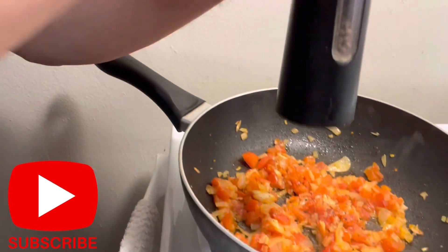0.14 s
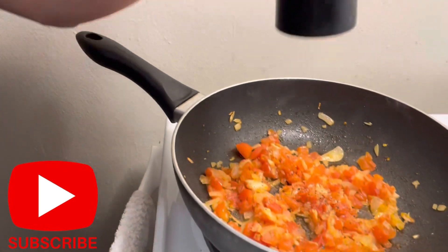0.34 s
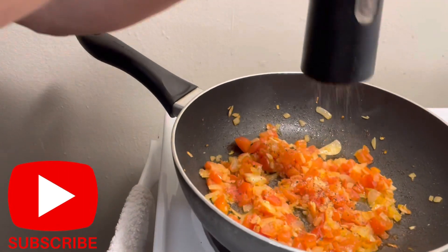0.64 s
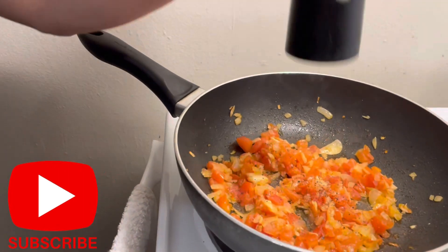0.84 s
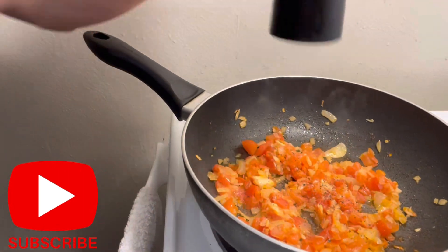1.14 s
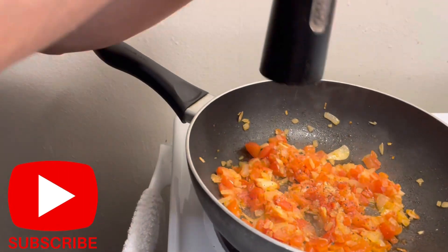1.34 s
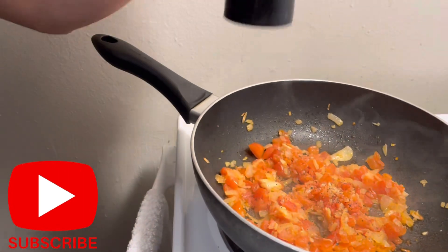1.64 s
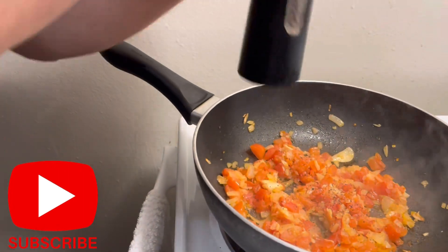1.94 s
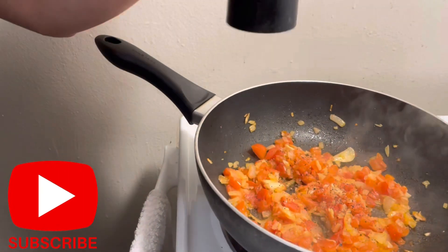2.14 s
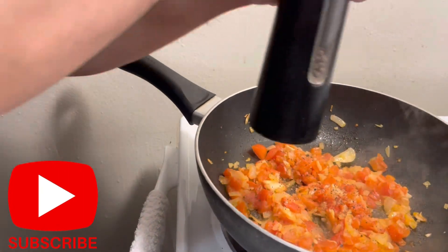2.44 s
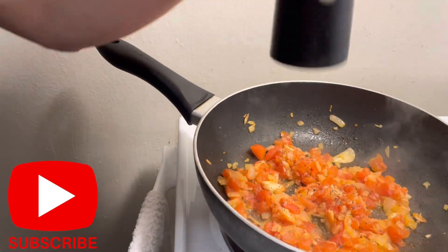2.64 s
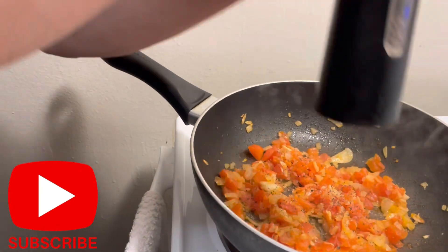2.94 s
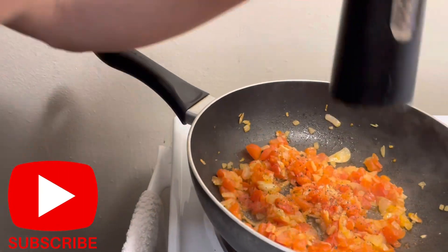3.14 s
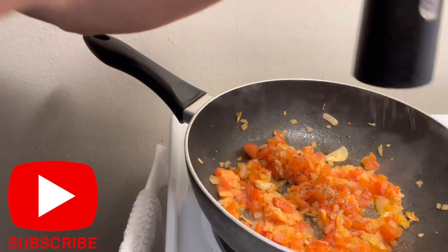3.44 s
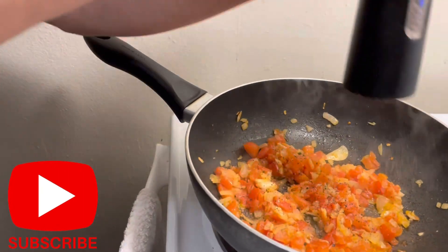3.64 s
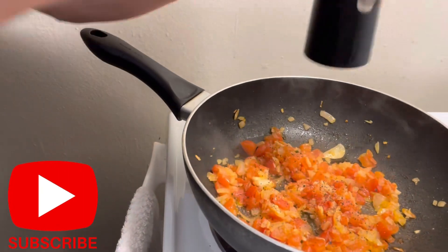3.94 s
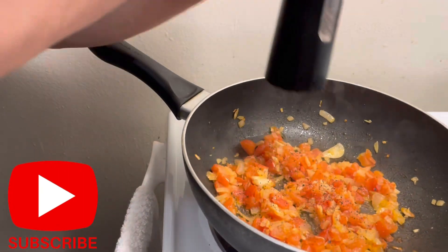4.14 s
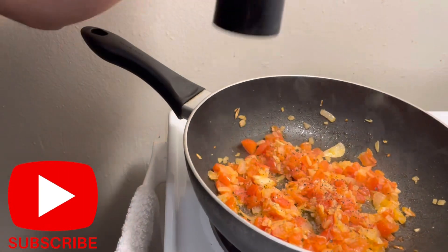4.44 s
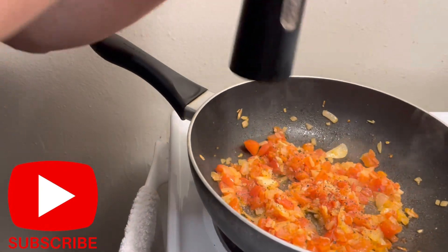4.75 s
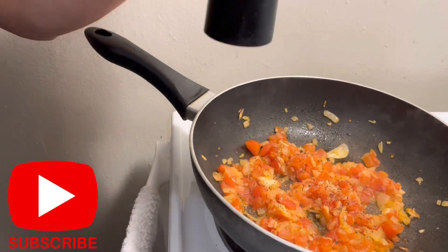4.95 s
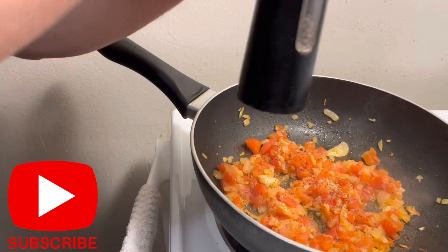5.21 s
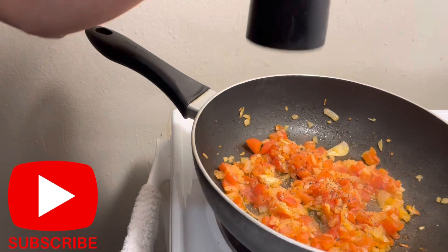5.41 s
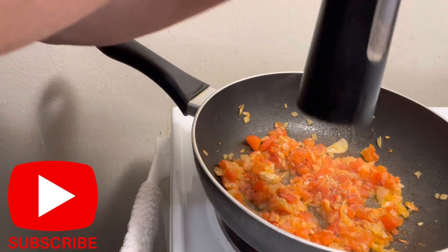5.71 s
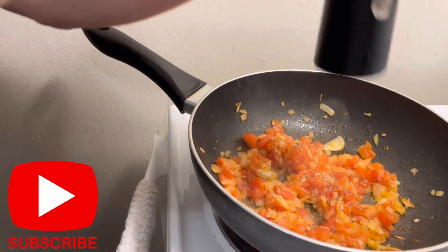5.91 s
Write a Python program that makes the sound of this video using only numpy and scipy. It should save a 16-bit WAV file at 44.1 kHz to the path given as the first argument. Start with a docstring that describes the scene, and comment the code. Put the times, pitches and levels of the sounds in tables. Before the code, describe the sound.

A pepper mill grinds in short crunching twists about twice a second over a sizzling pan and a low kitchen hum.

```python
"""A hand mill bites into peppercorns at once, over sizzling vegetables and motors humming against the
mains in a small kitchen. It is twisted about twice a second: corns crack and grind between the burrs
and ring the mill's body. From just after the first twist, fat spits in the pan. The last twist comes
at 5.6 s and leaves the pan frying. Throughout, two close microphone ports differ in treble phase."""
import sys
import numpy as np
from scipy import signal
from scipy.fft import rfft, irfft, next_fast_len
from scipy.io import wavfile

SR = 44100
rng = np.random.default_rng(int(sys.argv[2]) if len(sys.argv) > 2 else 0)


def persist_wave(psi):
    """Save psi, clipped to +-1, as 16-bit WAV."""
    counts = np.round(np.clip(psi, -1, 1) * 32767).astype(np.int16)
    wavfile.write(sys.argv[1], SR, np.atleast_2d(counts).T)


N = 267907
SIZE = next_fast_len(N + SR)
HZ = np.arange(SIZE // 2 + 1) * SR / SIZE

# peppercorns cracking: start_s, peak_db, bright_hz, knock_db, body_db, bright_db, crumble_ms
CORN_CRACKS = [(0.0189, -9.5, 3600, -12, 21, 16, 2), (0.0333, -12.5, 3800, -5, -9, 14, 1.9),
               (0.0378, -27, 4100, -12, 10, 20, 3.8), (0.142, -25.5, 2570, -13, 13, 7, 3.3),
               (0.524, -18.5, 3040, -11, -17, -4, 7.3), (0.544, -19.5, 2390, -17, -15, 0, 3.4),
               (0.575, -14, 4360, -3, -25, 15, 2.5), (0.6086, -9, 2260, -2, -28, -2, 3.3),
               (0.6152, -11, 2200, -11, -18, 0, 2.1), (0.6525, -5, 4170, -24, -24, 10, 3.5),
               (0.6605, -16, 3000, -24, 14, 15, 4.5), (1.103, -19, 4330, -9, -19, 20, 3.5),
               (1.1225, -15, 4330, -1, -17, 3, 3), (1.1283, -19, 4400, -9, -17, 10, 1.8),
               (1.1637, -7.5, 2500, 4, 17.5, -0.5, 3.1), (1.1748, -19, 2700, -5, 0, 12, 4.4),
               (1.1996, -18, 4100, -6, -19, 8, 2), (1.697, -18, 4300, -3, 3, 5, 3.8),
               (1.7134, -18.5, 4350, -14, 12, 6, 5.8), (1.734, -28, 2300, -9, -9, 2, 2.5),
               (1.7485, -15.5, 3180, -2, -3, 12, 1.7), (1.755, -15, 3000, 14, 11, 10, 3),
               (1.7645, -26, 3000, -4, -3, 6, 3), (1.824, -28, 4100, -8, -8, 7, 4),
               (2.27, -20, 3240, 6, -3, 10, 4.8), (2.3202, -16, 2220, -3, -21, 11, 6.9),
               (2.3511, -17.5, 3730, -7, -16, 19, 2.5), (2.416, -11, 3000, -15, 21, 10.5, 3.4),
               (2.8339, -21.5, 4200, -11, -17, 18, 2.5), (2.8443, -20, 4140, -9, 5, 5, 1.5),
               (2.849, -16, 4140, -5, -15, 0, 4.5), (2.8778, -18.5, 3160, -9, -11, 13, 1.3),
               (2.9082, -16.5, 4100, -11, -17, 3, 3.6), (2.9194, -13.5, 3900, -17, -24, 4, 3.3),
               (2.976, -27.5, 4350, -4, -9, 13, 6), (3.378, -20.5, 3450, -2, -15, 4, 4),
               (3.4212, -17.5, 2400, -1, -9, 6, 2.9), (3.433, -3, 3200, 2, 5, 8, 1.85),
               (3.448, -22, 2300, -3, 7, 3, 2.5), (3.478, -14, 3460, -16, 8, 4.5, 4.9),
               (3.925, -30, 4140, -5, -6, 6, 4), (3.943, -24.5, 1990, 7.5, -1, 6, 6.9),
               (3.992, -23.5, 2260, -12, 26, 6, 2.9), (4.011, -22, 1910, 15, 18.5, 13, 4.2),
               (4.488, -22, 3600, -5, 25, 4, 5.7), (4.5146, -6, 3620, -11, 19, 6, 4.3),
               (4.54, -4, 3650, 2, 16, 10, 2.4), (4.5435, -8, 3500, -12, 8, 4, 3.3),
               (4.553, -12.5, 2380, -9, -3, 9, 2), (4.939, -29, 3350, 8, -7, 8, 3.5),
               (5.039, -26.5, 4380, -7, 22, 6, 5.6), (5.067, -22.5, 4000, -13, 24, 12, 3.5),
               (5.083, -25, 3100, -14, 6, 10, 4.2), (5.1046, -13, 4170, 4, 20.5, 8, 3.3),
               (5.5908, -13.5, 4460, -6, 15, 7, 4.9), (5.5973, -19, 4300, -9, 0, 13, 3.3),
               (5.629, -17, 4180, 10, -6, 12, 3.9), (5.637, -11, 4200, -9, 0, 10, 1.6),
               (5.64, -11, 3870, 0, 27, 6, 2.5), (5.6471, -20, 4200, -5, -3, 16, 4.7),
               (5.6869, -18.5, 2100, -18, 26, 11, 2)]
# twists of the hand at full pressure: start_s, held_s, level_db, rasp_hz, rasp_db
HAND_TWISTS = [(0.0, 0.0073, -36, 3700, 3), (.53, 0.19, -42, 3080, 7), (1.105, 0.047, -37, 4400, 7.5),
               (1.699, 0.065, -35, 3270, -7), (2.264, 0.094, -40.5, 2270, -9),
               (2.836, 0.075, -35, 4100, 12), (3.43, 0.033, -35.5, 3380, 2), (3.93, 0.039, -40, 2920, 1),
               (4.512, 0.046, -32.5, 4100, 3), (5.069, 0.048, -35.5, 3830, 9),
               (5.6, 0.051, -39.5, 4640, -6)]
# resonances of the mill's body: pitch_hz, level_db, t60_s
MILL_MODES = [(410, -18, 0.022), (470, -1, 0.028), (610, -15, 0.019), (840, -34, 0.022),
              (1036, -20.5, 0.033), (1130, -27, 0.027), (1440, -12, 0.0098), (1750, -10.5, 0.0064),
              (2020, -12, 0.03), (2180, 4, 0.018), (2490, 2.5, 0.022), (2740, 3, 0.019), (3132, 5, 0.021),
              (3370, -1.5, 0.019), (3526, 6, 0.0085), (3777, 5, 0.013), (4110, 2, 0.031),
              (4413, 4.5, 0.015), (4600, -18.5, 0.023), (5320, 2, 0.0095), (6000, 1.5, 0.0065),
              (6790, 2.5, 0.0079), (9010, 1.5, 0.0062), (10360, -3, 0.003), (13000, -39.5, .002)]


def from_db(db):
    """Gain of a level in dB."""
    return 10 ** (np.asarray(db) / 20)


def rms_one(x):
    """Scaled to unit rms."""
    return x / np.sqrt(np.mean(x ** 2) + 1e-20)


def at_hz(points, hz):
    """A curve over frequency, read on a log axis."""
    point_hz, values = np.transpose(points)
    return np.interp(np.log(hz + 1), np.log(point_hz + 1), values)


def bell(hz, centre_hz, octaves):
    """A bell curve round a pitch, 1 at its centre."""
    return np.exp(-(np.log2(hz / centre_hz) / octaves) ** 2)


def filtered(x, response):
    """x through a frequency response given on the HZ grid."""
    return irfft(rfft(x, SIZE) * response, SIZE)[..., :N]


def drift(rate_hz):
    """Slow random wander of unit rms."""
    return rms_one(filtered(rng.standard_normal(N), 1 / (1 + (HZ / rate_hz) ** 2)))


def grains(per_s, spread_db):
    """Random clicks of uneven size."""
    sizes = from_db(spread_db * np.minimum(rng.exponential(1, N), 5)) * rng.choice([-1, 1], N)
    return sizes * (rng.random(N) < per_s / SR)


def add(track, start_s, sound):
    """Mix a short sound into the track."""
    at = round(start_s * SR)
    track[..., at:at + sound.shape[-1]] += sound[..., :N - at]


def stereo_bed(pair, spectrum):
    """Two unrelated noises, coloured and mixed as mid and side; unit rms."""
    # how alike left and right are: pitch_hz, correlation
    likeness = [(60, .95), (140, .9), (250, .6), (1000, .5), (3000, .72), (6000, .65), (8000, .96),
                (17000, .97)]
    alike = at_hz(likeness, HZ)
    colour = from_db(at_hz(spectrum, HZ))
    mid = filtered(pair[0], colour * np.sqrt(1 + alike))
    side = filtered(pair[1], colour * np.sqrt(1 - alike))
    return rms_one(np.array([mid + side, mid - side]))


def kitchen(x, t60_s=0.27, wall_cut_hz=4200):
    """The walls: a dull, dying noise tail of its own for each side."""
    t = np.arange(SR // 2) / SR
    dull = signal.lfilter(*signal.butter(1, wall_cut_hz, fs=SR), rng.standard_normal((2, len(t))))
    tail = dull * from_db(-60 * t / t60_s) * np.minimum(t / 0.013, 1)
    return signal.fftconvolve(x, tail / np.sqrt(np.sum(tail ** 2) / 2), axes=1)[:, :N]


def scattered(sound, echo_db=-4.5, t60_s=0.06):
    """Direct sound plus reflections off pan, hob and hands, new each time as the mill keeps moving."""
    t = np.arange(2048) / SR
    path = rng.standard_normal((2, len(t))) * from_db(-60 * t / t60_s) * np.minimum(t / 0.00055, 1)
    path = from_db(echo_db) * path / np.sqrt(np.sum(path ** 2) / 2)
    path[:, 0] += 1
    return signal.fftconvolve(sound[None], path, axes=1)


def rumble():
    """Room air and motor rumble: a low, steady noise bed."""
    # colour of the bed: pitch_hz, gain_db
    colour = [(20, -28), (32, -29), (45, 1), (55, 0), (72, -0.5), (90, 0.5), (105, -5), (130, -9),
              (200, -6.5), (420, -10), (540, -10.5), (600, -2), (750, -5), (850, -10.5), (1300, -10),
              (3000, -12.5), (8000, -32)]
    return from_db(-50) * stereo_bed(rng.standard_normal((2, N)), colour)


def hum():
    """Steady motor and mains tones, each wavering a little in level."""
    # two of these tones beat near 118 Hz: pitch_hz, level_db, left_over_right_db
    tones = [(53.2, -66, 0), (58.54, -59, 0), (80.1, -69, 0), (84.8, -65, 0), (117.08, -58, -4),
             (119.9, -63, -5), (157.5, -70, -5), (175.62, -65, -2), (196.5, -78, 8), (275.2, -71, 0),
             (314.9, -76, 6), (351.25, -70, -4)]
    t, out = np.arange(N) / SR, np.zeros((2, N))
    for hz, level_db, balance_db in tones:
        tone = np.sqrt(2) * np.sin(2 * np.pi * (hz * t + rng.random()))
        tone *= from_db(level_db + 0.49 * drift(7.2))
        out += tone * from_db([[balance_db / 2], [-balance_db / 2]])
    return out


def sizzle():
    """Tiny steam bursts merge into a fluttering hiss, with sparser sharp ticks on top."""
    # the pan's loudness: time_s, level_db
    frying = [(0.0, -40), (0.57, -39.5), (2.15, -39.5), (2.97, -39.5), (3.5, -38.5), (4.56, -39),
              (6.07, -40.5)]
    # colour of the sizzle: pitch_hz, gain_db
    colour = [(500, -20), (1000, -6), (2000, -3), (2800, -4), (4000, -2), (5000, -1), (6500, 0), (9000, 0),
              (11000, -2.5), (13000, -5), (15000, -1.5), (17000, -1.5)]
    fizz = rng.standard_normal((2, N)) * from_db(drift(16))
    for tick_hz in np.geomspace(5500, 15000, num=4):
        ticks = grains(70, spread_db=1.3) * from_db(2.5 * drift(8))
        fizz[0] += from_db(-15.5) * rms_one(filtered(ticks, bell(HZ + 1, tick_hz, octaves=0.85)))
    level_db = np.interp(np.arange(N) / SR, *np.transpose(frying))
    return from_db(level_db) * stereo_bed(fizz, colour)


def spits(decay_s=0.00087):
    """Drops of fat burst, each a snap of noise in a wide band."""
    # bursting drops: start_s, peak_db, centre_hz
    drops = [(0.436, -23, 7000), (0.851, -14, 13000), (0.8577, -34, 6500), (0.999, -30, 11000),
             (1.4486, -19.5, 6260), (1.593, -17, 12600), (1.5987, -15, 12000), (2.1377, -22, 12800),
             (2.3404, -23, 12100), (2.3428, -20, 9900), (2.523, -36, 6500), (2.535, -22.5, 5900),
             (2.863, -22, 6100), (3.009, -19, 5100), (3.056, -25, 13500), (3.206, -24, 7550),
             (3.346, -19, 13600), (3.705, -26, 4500), (3.758, -20, 10500), (4.011, -24, 12000),
             (4.0242, -18, 11400), (4.7731, -30, 14500), (4.96, -20, 11500), (5.244, -30, 5600),
             (5.404, -24, 12500), (5.7597, -26, 10700), (5.809, -28, 11800)]
    out, t = np.zeros((2, N)), np.arange(512) / SR
    for (start_s, peak_db, centre_hz), noise in zip(drops, rng.standard_normal((len(drops), len(t)))):
        band = signal.butter(1, [centre_hz / 1.37, min(centre_hz * 1.36, 19000)], "band", fs=SR)
        snap = signal.lfilter(*band, noise * np.exp(-t / decay_s))
        snap = from_db(peak_db) * snap / np.abs(snap).max()
        add(out, start_s, scattered(snap, echo_db=-7))   # drier than the mill, with a faint short tail
    return out


def body_modes(grip, detune_share=0.018):
    """One decaying sine for each mode of the mill, detuned by the grip, and their resting pitches."""
    hz, level_db, t60_s = np.transpose(MILL_MODES)[:, :, None]
    t = np.arange(round(.04 * SR)) / SR
    gripped_hz = hz * (1 + detune_share * grip[:, None])
    return from_db(level_db - 60 * t / t60_s) * np.sin(2 * np.pi * gripped_hz * t), hz[:, 0]


def grit_level(bite_db_per_s=1200, ease_db_per_s=237, shards_db=-29.5, shards_t60_s=0.15):
    """Grit swells as the hand bears down and fades as it lets go; shards rub on after each crack."""
    t = np.arange(N) / SR
    start_s, held_s, level_db = np.transpose(HAND_TWISTS)[:3, :, None]
    pressed_db = level_db - bite_db_per_s * np.maximum(start_s - t, 0)
    pressed_db -= ease_db_per_s * np.maximum(t - start_s - held_s, 0)
    crack_s, peak_db = np.transpose(CORN_CRACKS)[:2]
    breaks = np.zeros(N)
    breaks[(crack_s * SR).astype(int)] = from_db(peak_db + shards_db)
    shards = signal.lfilter([1], [1, -from_db(-60 / (shards_t60_s * SR))], breaks + 1e-18)
    return np.hypot(from_db(pressed_db.max(axis=0)), shards)


def grinding():
    """Dense grit clicks ring the mill's body, held a little differently on each twist."""
    out = np.zeros((2, N))
    grit = grit_level() * rms_one(grains(4000, spread_db=2.5) * from_db(2.5 * drift(60)))
    grips = rng.standard_normal((len(HAND_TWISTS), len(MILL_MODES)))
    for (start_s, _, _, rasp_hz, rasp_db), grip in zip(HAND_TWISTS, grips):
        begin_s = max(start_s - .1, 0)
        rubbing = grit[round(begin_s * SR):round((start_s + .35) * SR)]
        modes, hz = body_modes(grip)
        low_cut_db = 3.5 / (1 + (hz / 1500) ** 4)   # fine grit moves the low modes less
        body = from_db(rasp_db * bell(hz, rasp_hz, octaves=.12) - low_cut_db) @ modes
        rasp = signal.fftconvolve(rubbing, body / np.sqrt(np.sum(body ** 2)))
        add(out, begin_s, scattered(rasp))
    return out


def cracks(treble_db=-0.1):
    """A corn breaks in a quick run of fractures; each crack favours its own modes of the mill."""
    out, t = np.zeros((2, N)), np.arange(1024) / SR
    draws = rng.standard_normal((len(CORN_CRACKS), len(t) + 2 * len(MILL_MODES)))
    for crack, draw in zip(CORN_CRACKS, draws):
        start_s, peak_db, bright_hz, knock_db, body_db, bright_db, crumble_ms = crack
        noise, mode_jitter, grip = np.split(draw, [len(t), len(t) + len(MILL_MODES)])
        uneven = noise * np.abs(noise)   # a few fractures stand out
        fractures = uneven * np.exp(-1e3 * t / crumble_ms) * np.minimum(t / 0.001, 1)
        fractures[60] += 5.5   # after the first creaks the shell gives way in one main split
        modes, hz = body_modes(grip)
        favour_db = bright_db * bell(hz, bright_hz, octaves=.2)
        favour_db += np.select([hz < 800, hz < 1750, hz > 5000], [knock_db, body_db, treble_db])
        ringing = from_db(favour_db + 1.8 * mode_jitter) @ modes
        crunch = scattered(signal.fftconvolve(fractures, ringing))
        add(out, start_s, from_db(peak_db) * crunch / np.abs(crunch).max())
    return out


def scene():
    """Mill and spits with their reflections, over sizzle, rumble and hum."""
    bass_cut = (1j * HZ / (300 + 1j * HZ)) ** 3   # the mill's sound is cut away below about 300 Hz
    mill = filtered(cracks() + grinding(), bass_cut)
    near = mill + spits()
    return near + from_db(-17) * kitchen(near) + sizzle() + rumble() + hum()


def record(dry):
    """The two microphone ports differ in phase and level by frequency; the top is cut."""
    # phase between the ports: pitch_hz, left_lead_rad
    port_phase = [(0, 0), (1000, -.3), (2500, 0), (5000, .5), (6600, -.8), (7900, -3.0), (8800, -3.3),
                  (10600, -6.2), (12400, -6.4), (14000, -9.3), (17000, -9.6)]
    # balance between the ports: pitch_hz, left_over_right_db
    port_balance = [(60, 1), (130, 0), (290, 1.5), (640, -1), (1410, -0.5), (3100, 3), (6820, 0),
                    (15000, 0.2)]
    lead_rad = np.interp(HZ, *np.transpose(port_phase))
    left = np.exp(.5j * lead_rad) * from_db(at_hz(port_balance, HZ) / 2)
    ported = filtered(dry, np.array([left, 1 / left]))
    return signal.sosfilt(signal.cheby2(24, 80, 16300, fs=SR, output="sos"), ported)


dry = scene()
out = record(dry)
persist_wave(out)
```